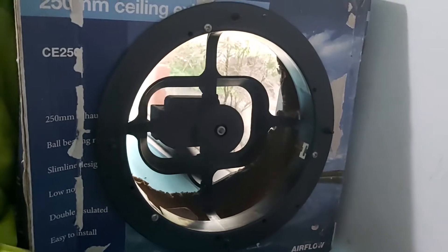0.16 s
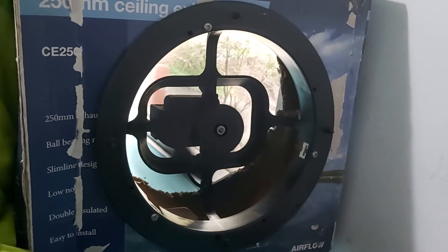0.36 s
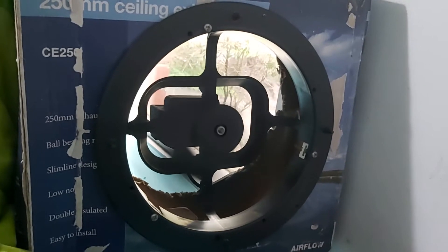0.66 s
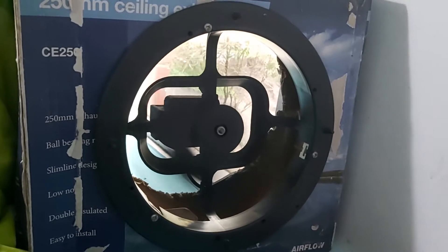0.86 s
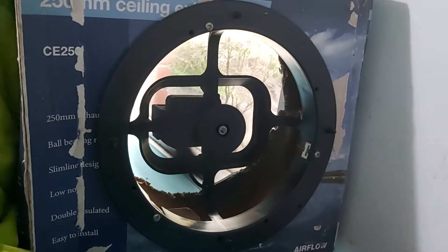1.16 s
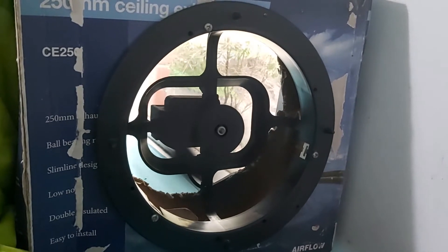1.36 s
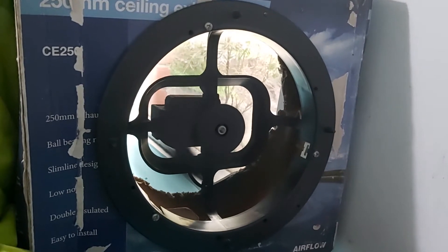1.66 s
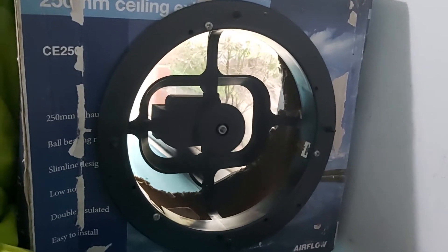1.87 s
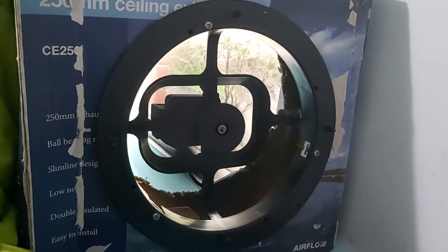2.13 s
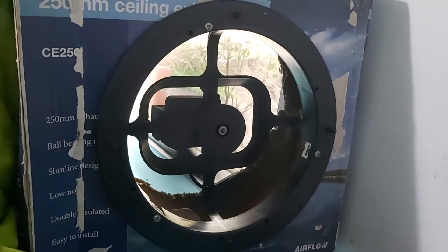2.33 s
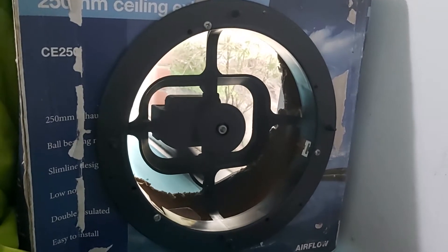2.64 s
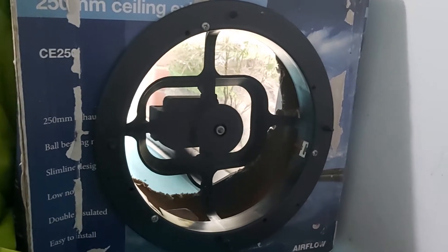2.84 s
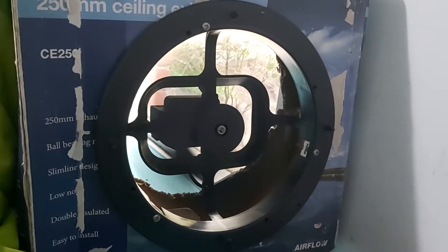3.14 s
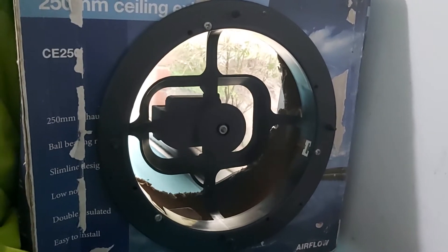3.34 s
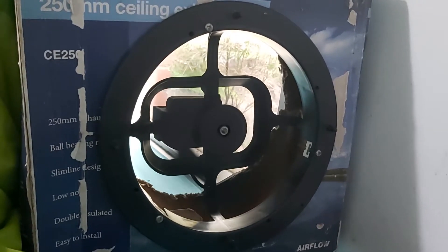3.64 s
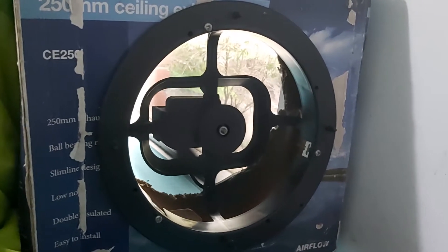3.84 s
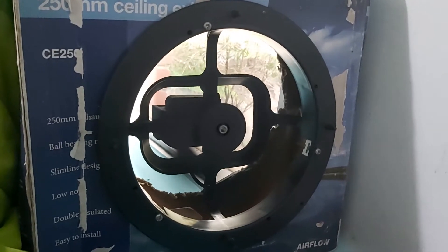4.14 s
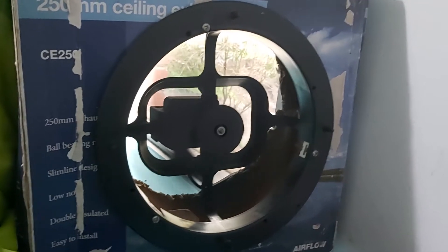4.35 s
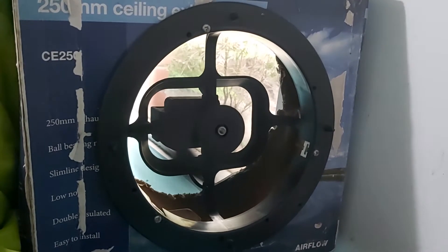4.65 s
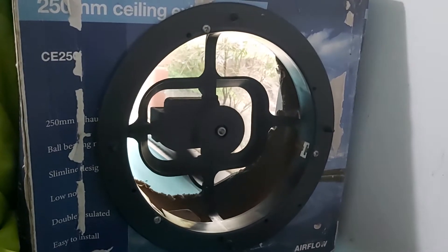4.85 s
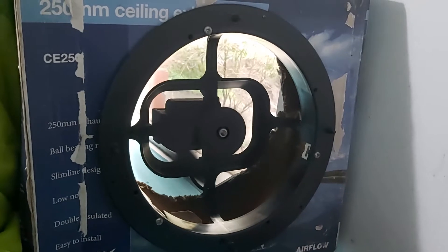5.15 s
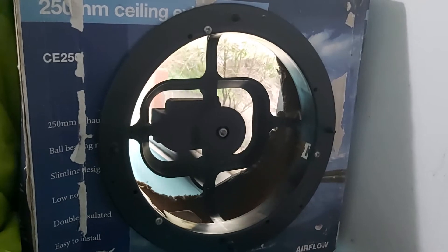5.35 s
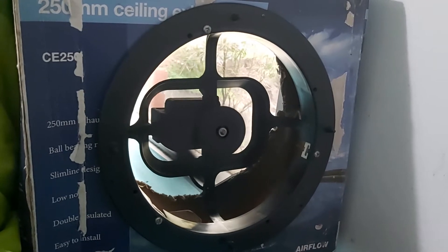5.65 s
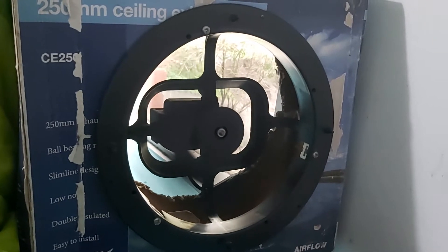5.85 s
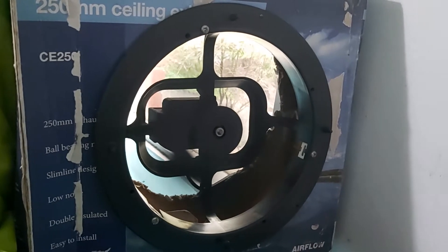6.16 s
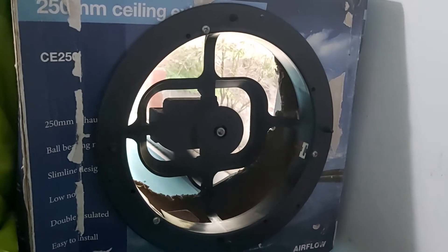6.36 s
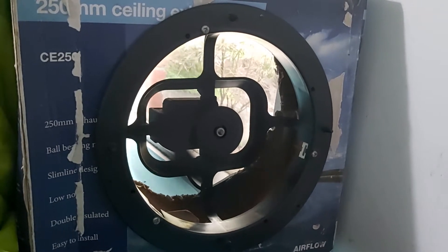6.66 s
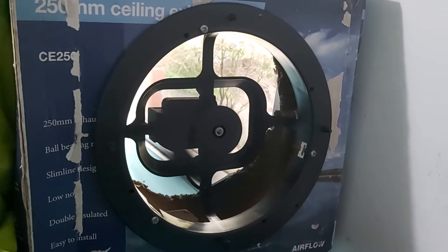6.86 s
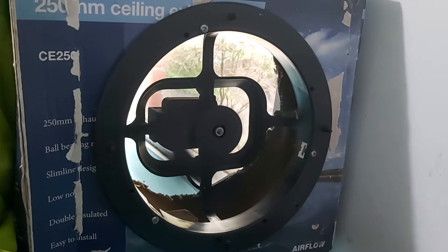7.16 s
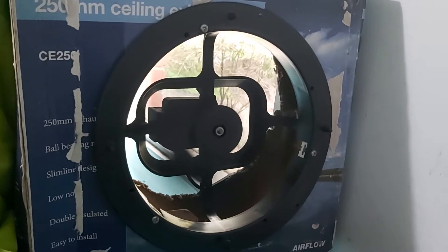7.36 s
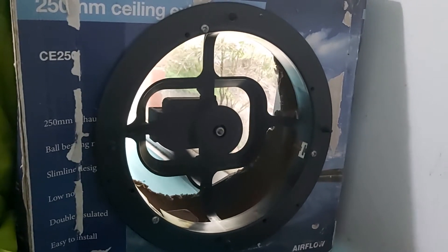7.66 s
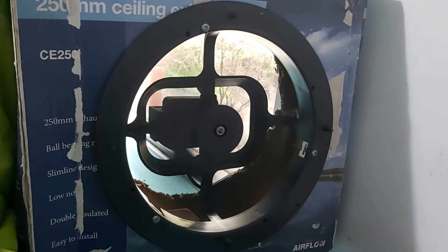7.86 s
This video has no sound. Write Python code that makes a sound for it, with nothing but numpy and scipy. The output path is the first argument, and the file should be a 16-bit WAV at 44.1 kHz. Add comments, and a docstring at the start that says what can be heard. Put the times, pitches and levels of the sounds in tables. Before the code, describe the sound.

The even, low drone of an electric fan's spinning blades continues indoors over a rumble and hiss of air.

```python
"""A three-bladed exhaust fan runs steadily, close to a phone with two microphone ports.
Each blade passing the struts gives a pressure pulse (a low tone with overtones), and the motor hums at
twice the mains rate. Turbulent air rumbles, whooshes and hisses, pulsing a little at every blade pass
and coloured by the housing and the walls."""
import sys
import numpy as np
from scipy import signal
from scipy.fft import rfft, irfft
from scipy.io import wavfile
from scipy.ndimage import uniform_filter1d

SR = 44100
rng = np.random.default_rng(int(sys.argv[2]) if len(sys.argv) > 2 else 0)


def int16_out(signal):
    """Quantize to a 16-bit WAV file."""
    q = np.round(np.clip(np.atleast_2d(signal).T, -1, 1) * 32767)
    wavfile.write(sys.argv[1], SR, q.astype(np.int16))


N = 352800
BLADES = 3
PORT_LEAD_RAD = 0.25  # a low tone reaches the right port first


def rotor(turns, blade_db):
    """Blade drone: unsteady inflow makes each partial waver in level, and in phase more for high ones."""
    # partials: multiple of the shaft rate, level/dB re blade_db, left minus right/dB, waver/dB
    partials = [(2, -33, 1.5, 2.5), (3, 0.5, -3.5, .5), (4, -24.5, 1.5, 2.5), (5, -24, 1.5, 1.5),
                (6, -14.5, -2, 0.83), (9, -17.5, -1.8, 2), (12, -22.5, 6, -0.5), (15, -21.5, 1.5, 0.5),
                (18, -32, 6, 2)]
    drone = 0
    for order, db, pan_db, waver_db in partials:
        skew_rad = 0.8 * (order > BLADES)  # overtones lead the blade tone, so the pulse leans
        phase = 2 * np.pi * order * turns + skew_rad + 0.035 * order * drift(5)
        drone += stereo_tone(phase, blade_db + db + waver_db * drift(6.6), pan_db)
    return drone


def motor_hum():
    """Steady hum from the motor's iron flexing with the mains."""
    # magnetic hum: f/Hz, level/dB, left minus right/dB
    hum = [(100.3, -40, 1.5), (198, -72.5, -0.5), (297, -60, 2)]
    t = np.arange(N) / SR
    return sum(stereo_tone(2 * np.pi * (hz * t + rng.random()), db + 0.96 * drift(2.9), pan_db)
               for hz, db, pan_db in hum)


def airflow(turns):
    """Turbulent air in three layers: low rumble, mid whoosh and high hiss."""
    # air spectra at the ports: f/Hz, left density/dB, right density/dB, likeness of the ports (0-1)
    rumble = [(25, -68.5, -67.5, 0.68), (40.4, -73, -72.5, 0.4), (55.3, -64.5, -59.5, 0.8),
              (66, -61.5, -60, 0.92), (90, -58, -58.5, 0.96), (117, -60, -56.5, 0.98),
              (128, -58.5, -55, 0.95), (176, -67.5, -61.5, 0.83), (208, -67, -65.5, 0.7),
              (258, -69, -65, 0.94), (340, -68, -68, 1), (430, -65.5, -66, 1), (503, -67.5, -68, 0.98),
              (595, -75, -67, 0.9)]
    whoosh = [(655, -70, -68.0, 0.46), (732, -74, -68.5, 0.063), (890, -75.5, -79, 0.13),
              (1060, -76.5, -81.5, 0.47), (1170, -75, -79, 0.66), (1510, -79, -81.5, 0.33),
              (1644, -74, -79, 0.32), (1840, -82.5, -83, 0.17), (2075, -78.5, -78.5, 0.61),
              (2300, -84, -80, 0.55), (2370, -80.5, -75.5, 0.57), (2647, -89.5, -80.6, 0.05),
              (2980, -88.5, -82, 0.06), (3270, -87, -89.5, 0.17)]
    hiss = [(3620, -96.5, -85, 0.33), (4170, -88, -92, 0.06), (4960, -93, -91, 0.3),
            (5470, -96.5, -92.5, 0.19), (6100, -96, -92, 0.16), (7120, -94, -103.8, 0.11),
            (7580, -103.5, -104.1, 0.082), (8100, -117.7, -103.4, 0.05), (9350, -123.9, -106.0, 0.04),
            (9800, -120.0, -106.6, 0.03), (10400, -118.2, -111.3, 0.05), (12100, -111.5, -110.0, 0.08),
            (13500, -113.2, -111.9, 0.03), (15500, -113.5, -113.3, 0.08)]
    return (air_layer(rumble, turns, chop_db=-0.55, gust_db=0.5, eddy_db=0.22, lead_rad=PORT_LEAD_RAD)
            + air_layer(whoosh, turns, chop_db=0.94, gust_db=0.24, eddy_db=0.11)
            + air_layer(hiss, turns, chop_db=0.8, gust_db=0.08, eddy_db=0.25))


def air_layer(spectrum, turns, chop_db, gust_db, eddy_db, lead_rad=0):
    """Air noise partly shared by the ports; blades chop it, gusts and eddies shake its level."""
    hz, *curves = np.transpose(spectrum)
    f = bin_hz()
    left_db, right_db, alike = (np.interp(np.log(f), np.log(hz), curve) for curve in curves)
    band = np.interp(f, [hz[0] / 1.1, hz[0], hz[-1], hz[-1] * 1.1], [0, 1, 1, 0])
    gain = undb([left_db, right_db]) * np.sqrt(band * SR / 2)
    mid, side = rfft(rng.standard_normal((2, N)))
    mid *= np.sqrt((1 + alike) / 2)
    side *= np.sqrt((1 - alike) / 2)
    ports = np.array([mid + side, (mid - side) * np.exp(1j * lead_rad)])
    chop = np.cos(2 * np.pi * BLADES * turns)
    swell_db = chop_db * chop + gust_db * drift(1.6) + eddy_db * drift(15)
    return irfft(gain * ports, N) * undb(swell_db)


def housing(f):
    """Colour of housing and duct: a bell-shaped lift or dip at each resonance."""
    # resonances: f/Hz, width/Hz, gain/dB
    resonances = [(170, 17, 2), (195, 7.9, -3), (236, 23, 3), (324, 20, 3), (434, 16, 0.5), (515, 17, 2),
                  (579, 34, 3), (737, 47, 2.5), (996, 30, 2.5), (1433, 41, 3.5), (1620, 60, 0.5),
                  (1760, 36, 1.5), (2036, 60, 2.5), (2200, 50, 1), (2380, 90, 0), (2650, 72, 1),
                  (3000, 110, 2), (3840, 170, 2.5), (5140, 150, 0), (6030, 270, 1.5), (8800, 360, 1.5)]
    return undb(sum(db / (1 + (2 * (f - hz) / width) ** 2) for hz, width, db in resonances))


def walls(f, t60_s=0.3, echo_db=-11, low_hz=600, high_hz=2500):
    """Room response at each port: direct sound plus a short midrange tail of echoes, mean power 1."""
    t = np.arange(SR) / SR
    tail = rng.standard_normal((2, SR)) * np.exp(-np.log(1000) * t / t60_s) * (t > 0.003)
    tail /= np.sqrt(np.sum(tail ** 2, axis=1, keepdims=True))
    wet = undb(echo_db) / np.sqrt(1 + (low_hz / f) ** 4 + (f / high_hz) ** 2)
    return (1 + wet * rfft(tail, N)) / np.sqrt(1 + wet ** 2)


def stereo_tone(phase, db, pan_db):
    """A sine around rms level db, pan_db louder on the left and slightly earlier on the right."""
    side = np.array([[1], [-1]]) / 2
    return np.sqrt(2) * undb(db + side * pan_db) * np.cos(phase - side * PORT_LEAD_RAD)


def drift(rate_hz):
    """Smooth random modulator: sample-and-hold, slewed twice, with spread 1."""
    hold = int(SR / rate_hz)
    steps = np.repeat(rng.standard_normal(N // hold + 1), hold)
    smooth = uniform_filter1d(uniform_filter1d(steps, hold), hold)[:N]
    return smooth / smooth.std()


def bin_hz():
    """Frequency of each spectrum bin, at least 1 Hz."""
    return np.maximum(np.arange(N // 2 + 1) * SR / N, 1)


def undb(db):
    """Decibels to gain."""
    return 10 ** (np.asarray(db) / 20)


def scene():
    """Blade drone and motor hum over a bed of air; housing and walls colour only the air."""
    # the rotor runs level, sags as the air load grows, then partly regains speed:
    # t/s, blade rate/Hz, blade tone level/dB
    fan_run = [(0, 77.95, -26.9), (1.3, 78.06, -26.1), (3.6, 77.48, -27.2), (4.8, 77.62, -27.4),
               (8, 77.73, -27.8)]
    times, blade_hz, blade_db = np.transpose(fan_run)
    t = np.arange(N) / SR
    turns = np.cumsum(np.interp(t, times, blade_hz)) / SR / BLADES
    air = airflow(turns)
    drone = rotor(turns, np.interp(t, times, blade_db))
    f = bin_hz()
    return drone + motor_hum() + irfft(rfft(air) * housing(f) * walls(f), N)


def record(dry, fade_s=0.004, top_hz=15720):
    """The sound fades in over a few milliseconds, and the phone cuts the top."""
    fade_in = np.clip(np.arange(N) / (fade_s * SR), 0, 1)
    high_cut = signal.ellip(14, 0.2, 80, top_hz, fs=SR, output="sos")
    return signal.sosfilt(high_cut, dry * fade_in)


dry = scene()
out = record(dry)
int16_out(out)
```